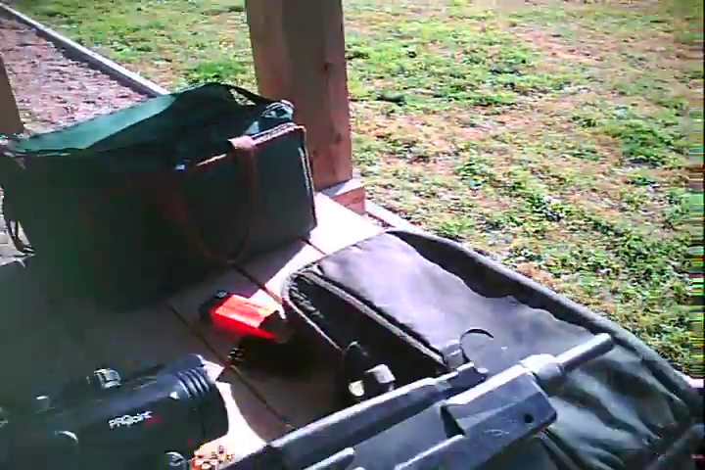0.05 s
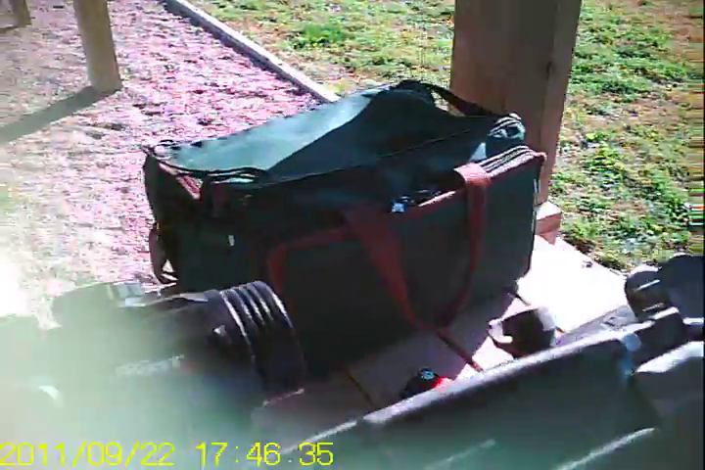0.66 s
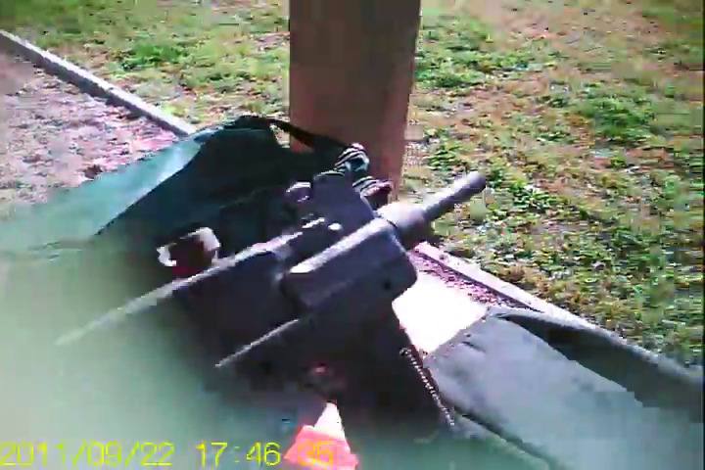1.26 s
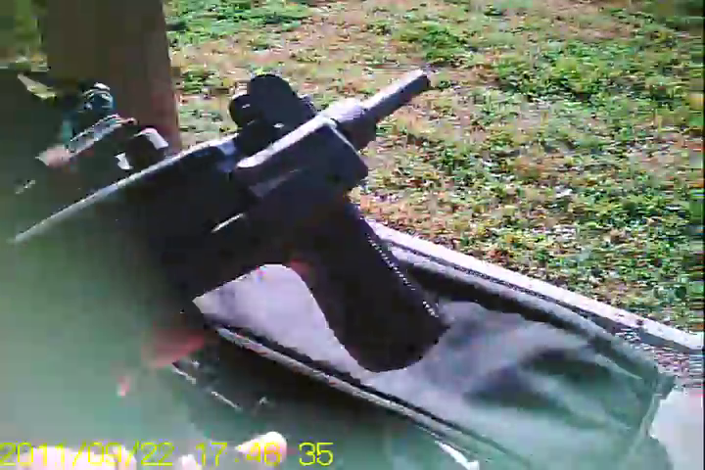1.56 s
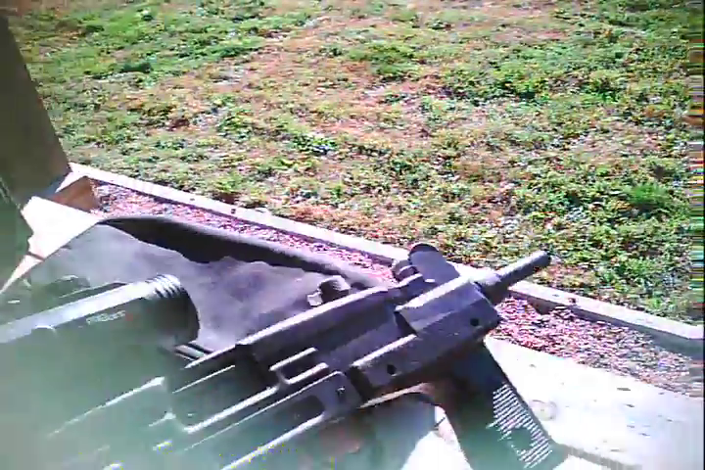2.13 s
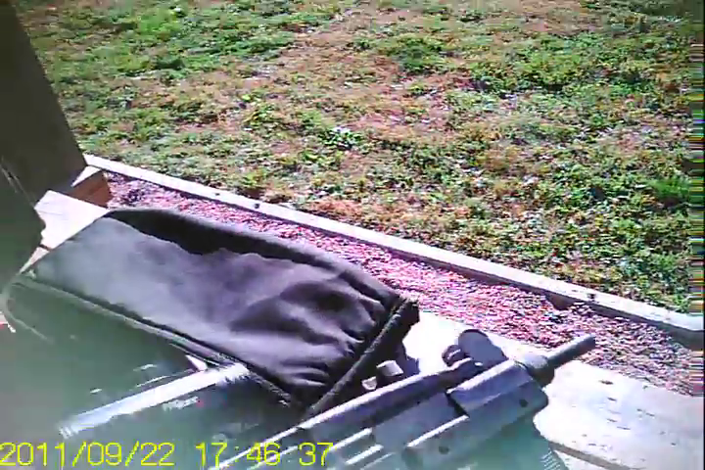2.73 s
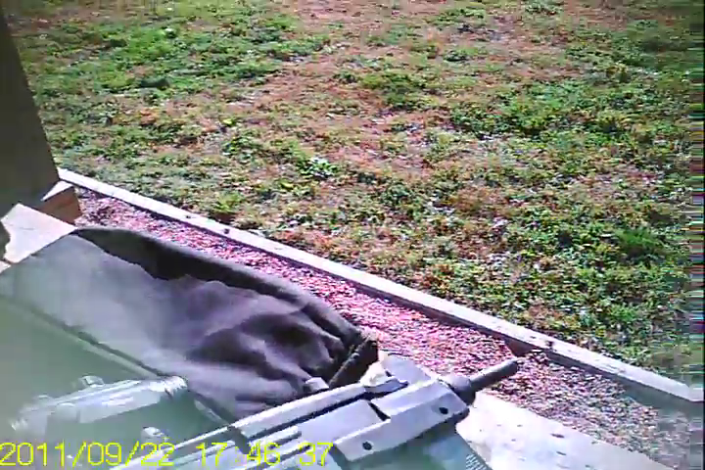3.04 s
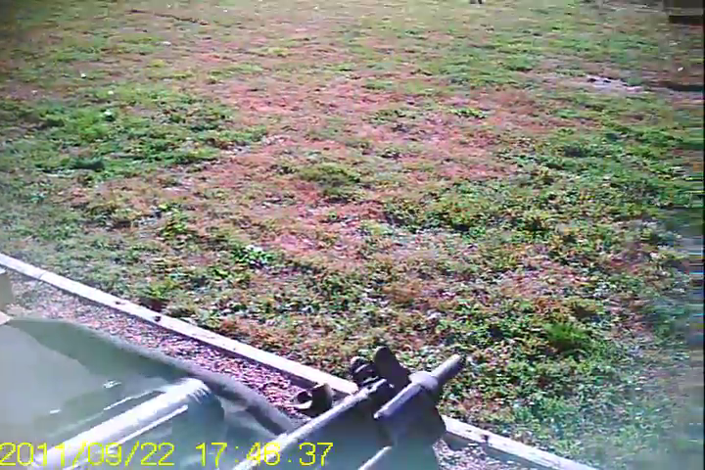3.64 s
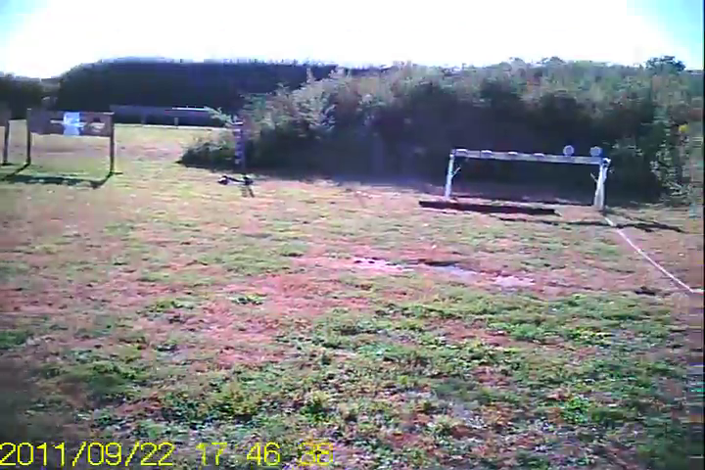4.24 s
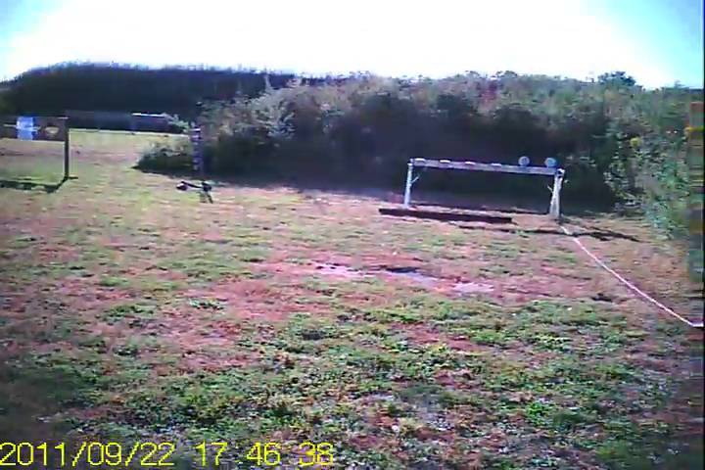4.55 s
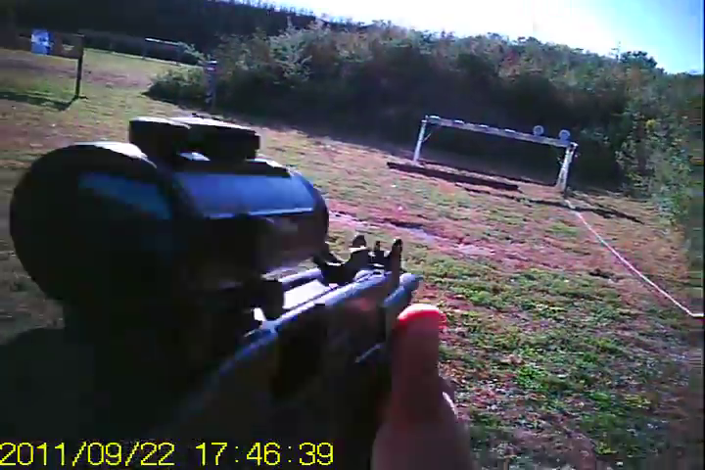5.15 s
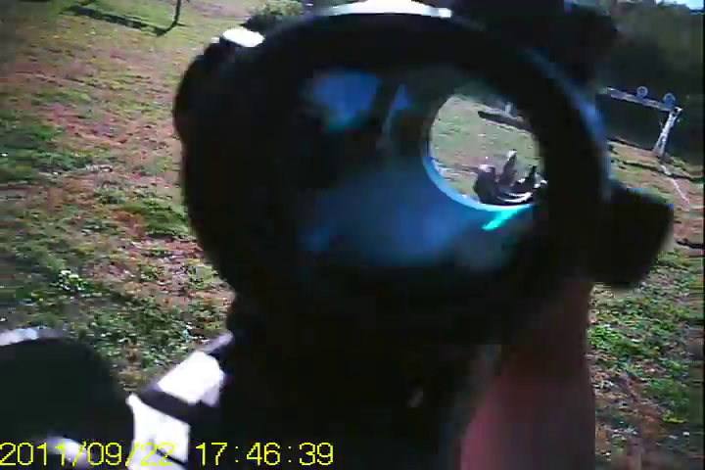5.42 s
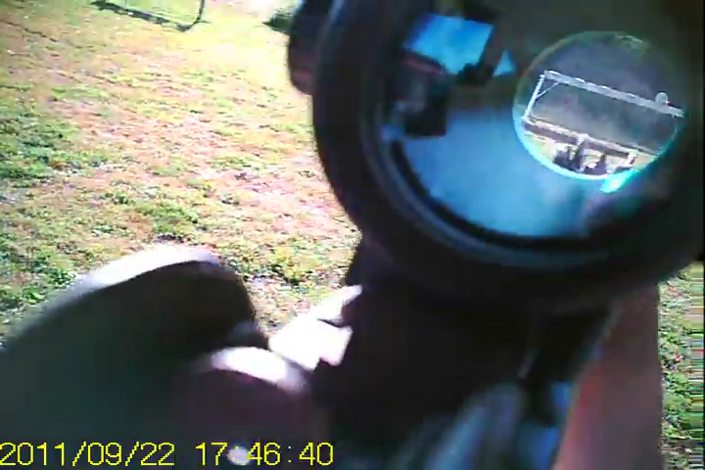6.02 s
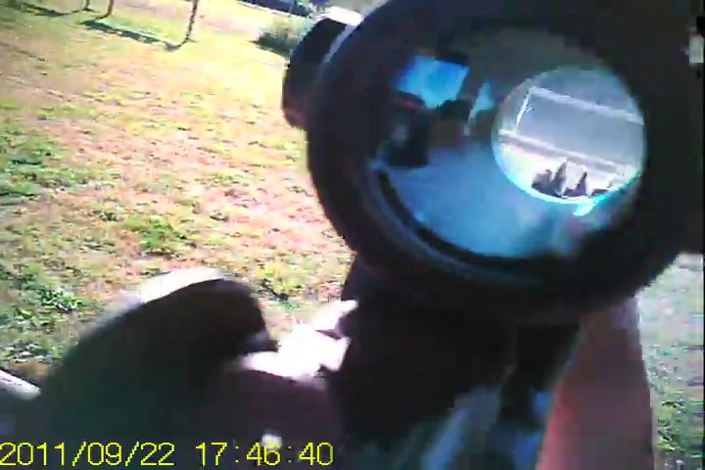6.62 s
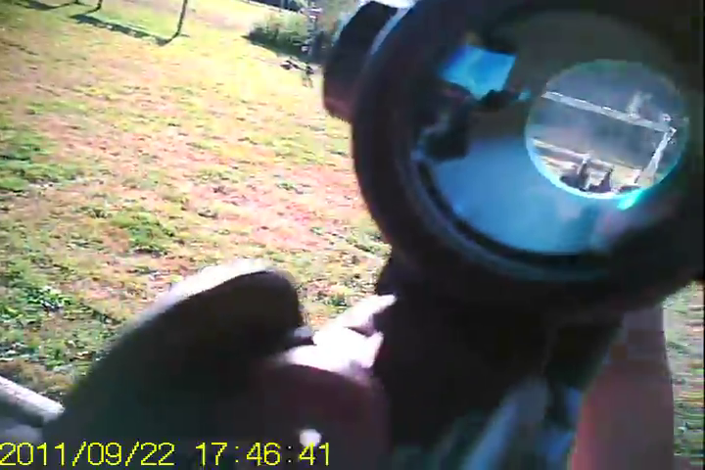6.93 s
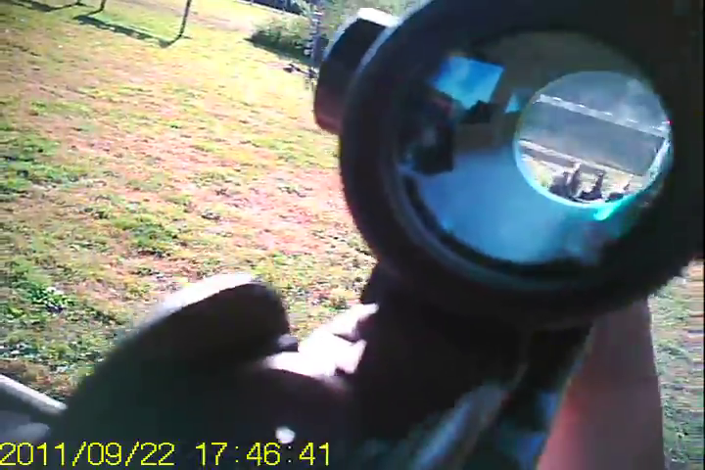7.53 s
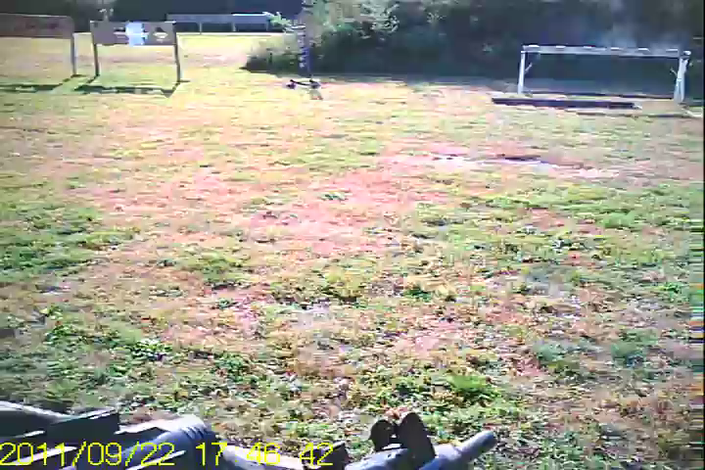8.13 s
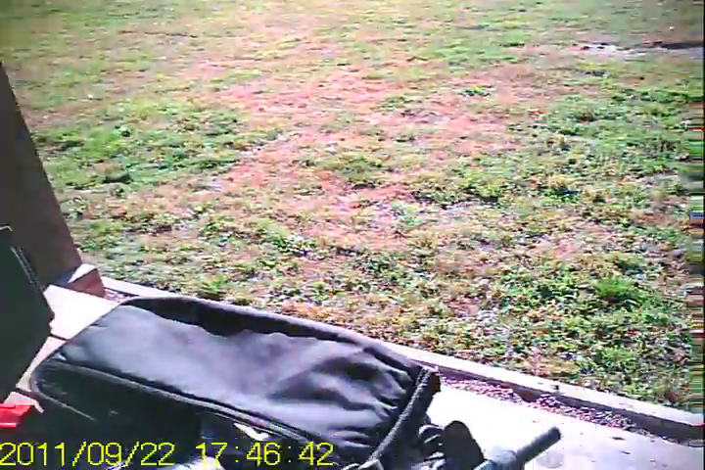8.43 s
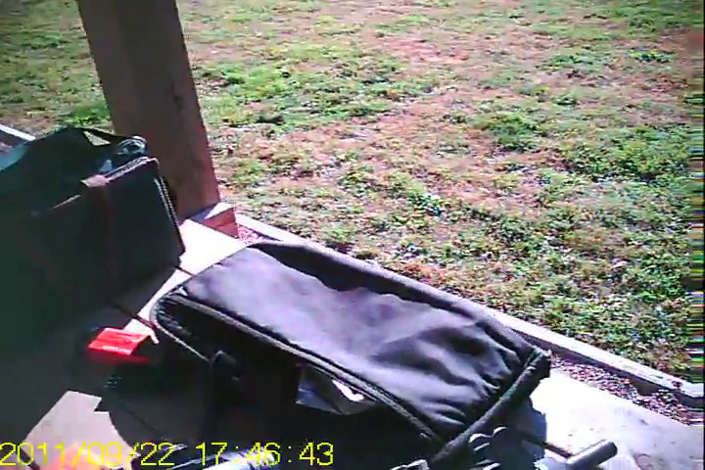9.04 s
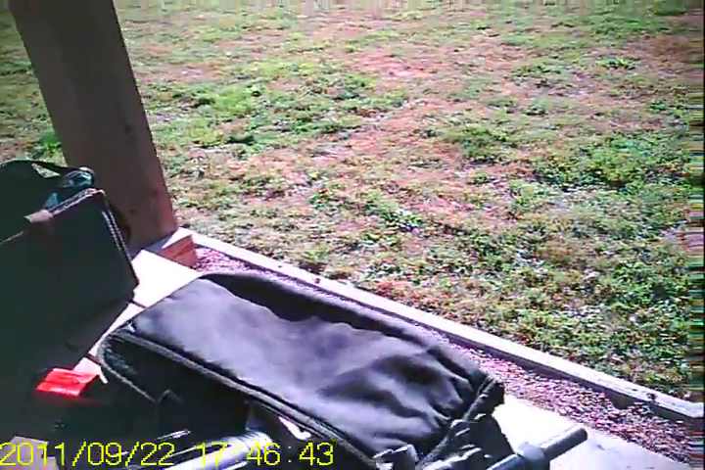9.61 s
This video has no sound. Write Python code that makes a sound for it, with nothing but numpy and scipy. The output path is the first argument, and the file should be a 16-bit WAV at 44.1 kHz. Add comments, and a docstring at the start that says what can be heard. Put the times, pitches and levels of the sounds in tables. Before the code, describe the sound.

Sharp metallic clicks, scrapes and clanks come from a submachine gun being readied right beside a small, cheap microphone buffeted by wind. Two quick automatic bursts follow, two rounds and then three, badly distorted and echoing briefly across an outdoor range. Brass cases tinkle, and the gun knocks down onto a wooden bench. Scattered distant shots sound near the start and end, with faint insects and far birds behind.

```python
"""At a roofed outdoor range, a submachine gun bumps on a wooden bench and is lifted, while shots crack
from farther lanes. Its steel parts click, scrape and clank close to a tiny worn camera. It fires two short
bursts that overflow the camera's converter into harsh crackle; spent cases ring as they land. At last the
gun is laid down again. All along, wind rumbles on the microphone over faint insects, joined by far birds
before the bursts."""
import sys
import numpy as np
from scipy import signal
from scipy.fft import rfft, irfft, next_fast_len
from scipy.io import wavfile
from scipy.ndimage import map_coordinates

SR = 44100
rng = np.random.default_rng(int(sys.argv[2]) if len(sys.argv) > 2 else 0)


def materialize(psi):
    """Save the field psi as 16-bit PCM at rate SR to the path in sys.argv[1].

    A 1-D psi becomes a single channel; in a 2-D psi each row is a channel.
    """
    bounded = np.clip(np.atleast_2d(psi).T, -1, 1)
    quanta = np.round(bounded * 32767).astype(np.int16)
    wavfile.write(sys.argv[1], SR, quanta)


N = 435266
TIME = np.arange(N) / SR
HIT = TIME[:SR]  # the one-second clock of a single hit

# Rounds fired, ten a second within a burst. Each row: start in seconds, level in dB.
ROUNDS = [(6.062, 20), (6.164, 19.5), (6.813, 18.5), (6.912, 19), (7.012, 15.3)]
# Tone colours of the muzzle blast, struck steel and airy hiss. Each row: frequency in Hz, level in dB.
BLAST = [(65, -42), (110, -9.5), (320, -6), (487, -2.5), (700, -13.5), (914, -5.5), (1470, -6), (1890, -3),
         (2560, -18), (3040, -16), (6390, -26), (7740, -27), (10500, -39), (13600, -64.5), (22000, -120)]
STEEL = [(180, -39.5), (300, -16.5), (876, -10.5), (1050, -4.5), (1230, -12.5), (1790, -5.5), (2370, -19),
         (3390, -10.5), (4050, -17), (7800, -17), (8920, -21), (9890, -18.5), (10500, -21.5), (13600, -65),
         (22000, -120)]
HISS = [(210, -29.5), (350, 0.5), (752, -3), (933, -7), (1360, -3.5), (1500, -7.5), (2060, -6.5),
        (2680, -13.5), (3420, -8), (4010, -15.5), (4250, -11.5), (5670, -15.5), (11000, -18), (14300, -47),
        (22000, -120)]


def gunfire(field_db=-35, field_t60=1.345, boom_db=-43, boom_t60=2.6):
    """Each blast rings under the roof, band by band, drums on it and rolls away across the field."""
    # The tail under the roof. Each row: frequency in Hz, t60 in seconds.
    roof_decay = [(100, .45), (400, 0.4), (1500, .37), (4000, 0.32), (10000, 0.26)]
    # The roof drumming. Each row: frequency in Hz, level in dB.
    drumming = [(55, -35.5), (75, -4.5), (87, 0), (100, -11), (150, -17.5), (400, -93.5)]
    field_tilt = [(300, -4), (1800, -0.5), (4700, 1), (8000, -2.5)]
    out = np.zeros(N)
    for start, db in ROUNDS:
        hz, t, bands = signal.stft(noise(BLAST), SR, nperseg=256)
        decay = np.exp(-np.log(1000) * t / along(roof_decay, hz)[:, None])
        roof = signal.istft(bands * decay, SR, nperseg=256)[1][:SR]
        field = amp(field_db) * fade(field_t60) * noise(BLAST, tilt=field_tilt)
        boom = amp(boom_db) * fade(boom_t60) * noise(drumming)
        add(out, start, amp(db) * (roof + field + boom))
    return out


def berm_echo(delay_s=0.19, rise_s=0.021, t60=0.6, gain_db=-33):
    """The earth bank behind the targets throws each blast back, its treble softened by the brush."""
    # The ring in the echo. Each row: centre in Hz, width in Hz, boost in dB.
    peaks = [(4630, 400, 11), (5730, 330, 6.5)]
    tilt = [(300, -6), (1800, -1), (3000, 3), (4700, -3.5), (8000, -3)]
    out = np.zeros(N)
    for start, db in ROUNDS:
        echo = resonate(noise(BLAST, tilt=tilt), peaks)
        add(out, start + delay_s, amp(db + gain_db) * echo * fade(t60) * attack(rise_s))
    return out


def cases(shimmer_db=3.5, spread_hz=51, rise_s=0.0087):
    """A spent brass case rings high and long, shimmering as it tumbles."""
    # Landings and bounces. Each row: start in seconds, pitch in Hz, level in dB, t60 in seconds.
    landings = [(6.351, 7450, -25, 0.24), (6.533, 10300, -48, 0.29), (6.61, 10230, -41, 0.24),
                (6.691, 10200, -45, 0.31), (7.34, 10240, -31.5, 0.4), (7.377, 10180, -36.5, 0.38),
                (7.592, 10250, -41, 0.36), (7.72, 10200, -54, 0.55), (7.885, 10196, -51.5, .6),
                (8.335, 10220, -49, .5)]
    out = np.zeros(N)
    for start, hz, db, t60 in landings:
        pitch = hz + spread_hz * wobble(220)
        ring = amp(shimmer_db * wobble(60)) * np.sin(2 * np.pi * np.cumsum(pitch) / SR)
        add(out, start, amp(db) * ring * fade(t60) * attack(rise_s))
    return out


def clicks(gain_db=-5, echo_db=-23, body_db=9, treble_db=6, ring_db=7, ring_width=0.095, rise_s=0.00026):
    """Hand-damped steel gives a short, dense ring; one resonance stands out where it is struck."""
    # Magazine, bolt and other parts. Each row: start in seconds, level in dB, body in dB,
    # treble in dB, ring in Hz, t60 in seconds.
    contacts = [(1.209, -32, -23, -7, 2410, 0.032), (1.363, -29.5, -15, 8, 5500, 0.032),
                (1.58, -3.5, -10, -16, 1220, .036), (1.612, -7, -5, -13, 1130, 0.042),
                (1.808, -28, -2, -16, 1120, 0.063), (1.985, -17.5, 6, -11, 1590, 0.03),
                (2.009, 0, -7.5, -5, 3070, 0.029), (2.096, -4.5, -14, -4.5, 1610, 0.028),
                (2.159, -4.5, -21, 4, 4200, 0.015), (2.166, -16, -3, -5, 1540, 0.023),
                (2.236, -12, -3, -6.5, 1540, 0.012), (2.286, -13.5, 2, -7, 1370, 0.082),
                (2.433, -13.5, -9, -13.5, 1560, 0.03), (2.748, 5, -28, 12, 1820, 0.019),
                (2.751, -2, -15, -6, 2880, 0.054), (3.047, -10, -15, -2, 1650, 0.014),
                (3.081, -13, -25, -6.5, 1720, 0.066), (3.165, -3.5, -32, -2, 2140, 0.03),
                (3.664, -8.5, -5.5, -1.5, 3380, 0.063), (3.674, -3, -15, 1, 1470, 0.027),
                (3.786, -21, -2, -5, 1050, 0.14), (3.824, -16, -7, -6, 1430, 0.046),
                (3.844, 2, -21, 10, 3530, 0.025), (3.895, -10.5, -15, 0, 1410, 0.03),
                (3.957, 4, -1, -0.5, 1980, 0.044), (4.023, -16.5, -30, -8, 1910, 0.061),
                (4.042, -12.5, -8, 4.5, 1110, 0.092), (4.06, -9.5, -9, -1, 1110, 0.02),
                (4.123, 4.5, -34, 6.5, 3065, 0.05), (4.217, -18, -27, -11, 1020, 0.11),
                (4.233, -14.5, -17, 0, 2000, 0.19), (4.316, 2, -33, 0, 1914, 0.076),
                (4.376, 4.5, -38, -16, 1810, 0.036), (4.44, 6.5, -28, -1, 1455, 0.041),
                (4.755, -32, -14, -16, 1800, .03), (4.925, -29.5, -20, 6, 9700, .04),
                (4.955, -32, -8, -4, 2100, 0.034), (5.001, -24.5, -10, -4, 1770, 0.022),
                (5.101, 4, 8, -6, 2280, 0.029), (5.112, -18, 12, -8, 1720, 0.036),
                (5.208, -23, 10, -27, 1840, 0.12), (5.234, -14.5, 9, -13, 1970, 0.03),
                (5.332, -16.5, 1, -17, 1960, 0.015), (6.014, -2.5, -32, -20.5, 1790, 0.02),
                (6.608, -4, -12, -13.5, 1590, 0.043), (6.682, -4, -1, -21.5, 1680, 0.091),
                (6.773, -6, -26, -26, 1764, 0.063), (7.374, -3.5, -1.5, -16, 1490, 0.033),
                (7.416, -10.5, -10, -15, 1100, 0.062), (7.591, -7, -6, -12, 1320, 0.1),
                (7.717, -1, -21, -19, 1190, 0.0089), (7.885, -21, -5, -17.5, 1710, 0.14),
                (8.017, -29, -2, -15, 1980, 0.24), (8.805, -18, -8, -5, 1600, 0.024),
                (8.851, -30, -1, -9, 1000, 0.034), (8.974, 2.5, -41, -1.5, 2060, 0.018),
                (9.049, -7, 1, -13, 1550, 0.0084), (9.16, -4, -26, 2.5, 3480, 0.0064),
                (9.317, -18, -8, -8, 1800, 0.02)]
    out = np.zeros(N)
    for start, db, body, treble, ring_hz, t60 in contacts:
        tilt = [(500, body + body_db), (1300, 0.052), (2800, 0.017), (6000, treble + treble_db)]
        steel = noise(STEEL, tilt=tilt)
        ring = filtered(steel, lambda hz: 1 + amp(ring_db) * bell(hz, ring_hz, ring_width * ring_hz))
        contact = unit(ring) * fade(t60) * attack(rise_s)
        add(out, start, amp(db + gain_db) * (contact + amp(echo_db) * roof_echo()))
    return out


def scrapes(rough_db=3, release_t60=0.066, echo_db=-13):
    """Steel sliding on steel catches and slips, then rings out."""
    # Each row: start in seconds, length in seconds, level in dB.
    slides = [(2.758, 0.017, 3.5), (4.267, 0.018, -9), (4.285, 0.015, -6.5), (4.464, 0.034, -12.5),
              (4.492, 0.025, -4.5), (6.014, 0.0045, -8.5), (6.037, 0.022, -2), (6.766, 0.0047, -10.5),
              (6.792, 0.025, -6)]
    out = np.zeros(N)
    for start, length, db in slides:
        stroke = np.exp(-np.log(1000) * np.maximum(HIT - length, 0) / release_t60)
        slips = amp(rough_db * wobble(300))
        steel = noise(STEEL, tilt=[(300, -9.5), (1500, 1), (7000, 3)])
        add(out, start, amp(db) * stroke * slips * steel)
        add(out, start + length / 2, amp(db + echo_db) * roof_echo())
    return out


def clanks(reach_octaves=0.29):
    """The hollow sheet-steel receiver rings in close modes; where it is struck decides which lead."""
    # Hard contacts. Each row: start in seconds, level in dB, centre of the favoured modes in Hz.
    blows = [(0.044, -12, 1500), (2.788, -20.5, 1700), (4.318, -12.5, 1950), (4.374, -22.5, 1850),
             (4.441, -21, 1900), (4.508, -34.5, 1900), (9.44, -17, 1480)]
    # The receiver's modes. Each row: pitch in Hz, level in dB, t60 in seconds.
    receiver = [(1190, -6, 0.17), (1418, -5, .15), (1653, -5.5, 0.17), (1756, 2.5, 0.069), (1895, -7, 0.17),
                (2022, -6, 0.21), (2300, -1, 0.054), (2930, -5.5, 0.08)]
    out = np.zeros(N)
    for start, db, centre_hz in blows:
        modes = []
        for hz, level, t60 in receiver:
            distance = np.log2(hz / centre_hz) / reach_octaves
            modes.append((hz, level - 10 * np.log10(1 + distance ** 2), t60))
        add(out, start, amp(db) * ringing(modes))
    return out


def clinks():
    """A small loose steel fitting swings against the gun and rings briefly."""
    # Each row: start in seconds, level in dB.
    swings = [(7.718, -29), (9.158, -13)]
    # The fitting's modes. Each row: pitch in Hz, level in dB, t60 in seconds.
    fitting = [(1480, -20, 0.068), (3670, 5, 0.019), (3820, 1, 0.02), (5340, -7, 0.021), (8450, -12, .025)]
    out = np.zeros(N)
    for start, db in swings:
        add(out, start, amp(db) * ringing(fitting))
    return out


def bumps(thud_db=-3, boards_db=-13, clack_db=2, clack_delay_s=0.002, rise_s=0.00088, echo_db=-18):
    """The gun bumps the bench: the wood thuds, its boards ring and the steel clacks just after."""
    # Each row: start in seconds, level in dB, relative clack level in dB.
    knocks = [(0.009, -11, -9.5), (0.039, -4, -1.5), (0.123, -15.5, -6.5), (0.174, -26.5, -10.5),
              (0.323, -37.5, -44), (0.583, -21, -8.5), (0.653, -29.5, -21), (0.679, -29, -25),
              (0.711, -37, -21), (0.773, -37.5, -24), (9.433, -2.5, -8), (9.53, -22.5, -12.5),
              (9.581, -20, -47), (9.603, -1.5, -8.5), (9.613, -10.5, -32)]
    # The colour of the thud. Each row: frequency in Hz, level in dB.
    bench = [(80, -8), (170, 9.5), (270, 6.5), (360, 6), (480, 8.5), (620, 6.5), (900, 4), (1300, -6),
             (1900, -13.5), (2700, -51), (6000, -22.5)]
    # The boards' modes. Each row: pitch in Hz, level in dB, t60 in seconds.
    boards = [(168.4, -7.5, 0.29), (305.2, 3.5, 0.17), (352, -21, 0.26), (508.3, 3.5, 0.11),
              (765, -15, 0.29), (940, -20.5, 0.046)]
    out = np.zeros(N)
    for start, db, clack in knocks:
        thud = amp(thud_db) * noise(bench) * fade(t60=0.14)
        wood = (thud + amp(boards_db) * ringing(boards)) * attack(rise_s)
        steel = amp(clack + clack_db) * noise(STEEL, tilt=[(500, -2.5), (5000, 16)]) * fade(t60=0.037)
        add(out, start, amp(db) * (wood + amp(echo_db) * roof_echo()))
        add(out, start + clack_delay_s, amp(db) * steel)
    return out


def roof_echo(t60=0.26, rise_s=0.003):
    """The dull, diffuse answer of roof and bench to a small sound."""
    return noise(STEEL, tilt=[(2000, -4), (4000, -6.5), (10000, -9.5)]) * fade(t60) * attack(rise_s)


def handling(ticks_per_s=40, tick_db=10, tick_t60=0.014, attack_s=0.39, release_s=0.78):
    """Clothes rustle and loose gun parts tick as each movement builds up, holds and dies away."""
    # Lifting, loading, shouldering, laying down. Each row: start and length in seconds, level in dB.
    moves = [(1.4, 2.5, -53.5), (3.833, 0.09, -58.5), (4.955, 0.32, -58.5), (8.686, 1.24, -48.5)]
    folds = amp(2.5 * wobble(25, size=N))
    cloth = folds * noise(HISS, size=N, tilt=[(400, -1.7), (1800, -0.23), (8000, 1)])
    touches = (rng.random(N) < ticks_per_s / SR) * rng.random(N) ** 2
    ticks = signal.fftconvolve(touches, fade(tick_t60))[:N] * noise(STEEL, size=N)
    motion = np.zeros(N)
    for start, length, db in moves:
        before, after = np.maximum(start - TIME, 0), np.maximum(TIME - start - length, 0)
        motion += amp(db) * np.exp(-before / attack_s - after / release_s)
    return motion * (cloth + amp(tick_db) * ticks)


def far_shots(gain_db=-4, treble_db=7, rise_s=0.0013, roll_db=-16):
    """Distance smears each report into a short bright wash that leaves a hollow ring and a dull roll."""
    # Other lanes. Each row: start in seconds, level in dB, treble in dB, base t60 in seconds, ring in dB.
    shots = [(0.4162, -27.5, -9.5, 0.52, -7), (0.9, -30, -1, 0.42, 1), (1.1493, -35.5, -13, 0.55, -6),
             (1.2354, -38.5, -15, .8, -9), (6.533, -10, -23, 0.83, -12), (6.7151, -18.5, -22, 0.58, -10),
             (8.53, -17.5, -19.5, 0.4, -10), (9.2282, -22.5, -19, 0.63, -7), (9.7099, -19, 6, 0.2, -12)]
    # The thin colour of a report. Each row: frequency in Hz, level in dB.
    report = [(400, -13), (750, -10.5), (1200, -6), (1700, -2), (2050, -13), (2500, -4.5), (3500, -7),
              (4200, -7), (5400, -10), (6300, -6), (8000, -5.5), (10500, -11)]
    # Its hollow ring. Each row: centre in Hz, width in Hz, boost in dB.
    peaks = [(2020, 220, 19), (3630, 260, 20), (5510, 280, 20), (7420, 300, 13), (9330, 300, 15)]
    out = np.zeros(N)
    for start, db, treble, t60, ring_db in shots:
        tilt = [(2500, 0.0037), (7000, treble + treble_db)]
        crack = noise(report, tilt=tilt) * fade(0.5 * t60)
        hollow = unit(resonate(noise(report, tilt=tilt), peaks))
        ring = amp(ring_db) * hollow * fade(1.15 * t60)
        roll = amp(roll_db) * noise(report, tilt=[(2000, 35), (7000, -15)]) * fade(1.5 * t60)
        add(out, start, amp(db + gain_db) * (crack + ring + roll) * attack(rise_s))
    return out


def wind(surge_db=3, surge_rate=9, lumps_db=3.5, flutter_db=-44.5, flutter_growth=0.58):
    """The draught surges on the microphone and flutters as it grows; puffs swell and sink on top."""
    # Air passing the camera, strongest with the gun raised. Each row: time in seconds, level in dB.
    draught = [(0, -41), (0.45, -36), (1.4, -34), (1.88, -40), (2.05, -32), (3.25, -18), (4.3, -25),
               (4.72, -36), (4.95, -23.5), (5.9, -29.5), (7.8, -28), (8.5, -32), (9.4, -28.5), (9.87, -36)]
    # Each row: centre in seconds, length in seconds, flutter in dB, deep push in dB.
    puffs = [(1.414, 0.21, -47, -25), (1.614, 0.28, -38.5, -31), (2.067, 0.25, -27.5, -30.5),
             (2.252, 0.23, -23, -21.5), (2.51, 0.34, -27, -38), (2.721, 0.16, -21, -18),
             (3.086, 0.16, -26, -25), (3.191, 0.18, -18.5, -19), (3.703, 0.13, -28.5, -13.5),
             (5.135, 0.13, -39, -16), (5.517, 0.25, -27.5, -21), (8.048, 0.14, -31, -23.5),
             (8.182, 0.099, -31, -39)]
    # Colours of the deep buffeting and the flutter above it. Each row: frequency in Hz, level in dB.
    buffet_colour = [(5, -6.5), (20, 5), (50, -7), (75, -11.5), (120, -31.5), (300, -80.5)]
    flutter_colour = [(40, -12), (85, -1), (140, -11), (250, -18), (500, -44.5), (1500, -82.5)]
    draught_db = automation(draught) + surge_db * wobble(surge_rate, size=N)
    buffet = amp(draught_db)
    flutter = amp(flutter_db + flutter_growth * (draught_db - draught_db.mean()))
    for centre, length, puff_db, push_db in puffs:
        swell = np.cos(np.pi * np.clip((TIME - centre) / length, -0.5, 0.5))
        buffet = np.hypot(buffet, amp(push_db) * swell)
        flutter = np.hypot(flutter, amp(puff_db) * swell)
    lumps = unit(amp(lumps_db * wobble(18, size=N)))
    return buffet * noise(buffet_colour, size=N) + flutter * lumps * noise(flutter_colour, size=N)


def hiss(level_db=-58):
    """A faint, steady bed of hiss."""
    return amp(level_db) * noise(HISS, size=N)


def insects(flicker_db=3):
    """Insects in the grass buzz in a high band that swells and fades."""
    # Each row: time in seconds, level in dB.
    swells = [(0, -75), (1.4, -63.5), (3.3, -54), (5.8, -60.5), (8.2, -63), (9.87, -53.5)]
    # The colour of the buzz. Each row: frequency in Hz, level in dB.
    buzz = [(4000, -47.5), (6600, -10.5), (7500, -0.5), (8100, -4), (9300, -10), (11000, -61.5)]
    return amp(automation(swells) + flicker_db * wobble(42, size=N)) * noise(buzz, size=N)


def birds(count=70, pitch_hz=4500, level_db=-64, blur=0.6, start_s=1.7, end_s=5.95, chirp_s=0.035, fall=0.1):
    """Far birds call in faint, quick, falling chirps, blurred by the trees."""
    out = np.zeros(N)
    progress = np.minimum(HIT / chirp_s, 1)
    for when, pitch, strength in rng.random((count, 3)):
        hz = pitch_hz * (0.92 + 0.16 * pitch) * (1 + fall * (0.5 - progress))
        chirp = np.sin(np.pi * progress) ** 2 * np.sin(2 * np.pi * np.cumsum(hz) / SR)
        add(out, start_s + when * (end_s - start_s), amp(level_db) * (0.5 + strength) * chirp)
    return out * (1 + blur * wobble(250, size=N))


def amp(db):
    """Decibels to gain."""
    return 10 ** (np.asarray(db) / 20)


def unit(x):
    """Scale to rms 1."""
    return x / np.sqrt(np.mean(x ** 2) + 1e-20)


def along(points, hz):
    """Read a curve of (Hz, value) points on a log frequency axis."""
    knots_hz, values = np.transpose(points)
    return np.interp(np.log(hz + 1), np.log(knots_hz + 1), values)


def automation(points):
    """A fader ride through (seconds, value) points."""
    return np.interp(TIME, *np.transpose(points))


def wobble(rate, size=SR):
    """A smooth random curve, rate knots a second."""
    knots = rng.standard_normal(int(size * rate / SR) + 4)
    return map_coordinates(knots, [np.arange(size) * rate / SR])


def filtered(x, gain):
    """Equalise x with a gain that depends on frequency."""
    padded = next_fast_len(len(x) + 4096)
    return irfft(rfft(x, padded) * gain(np.fft.rfftfreq(padded, 1 / SR)), padded)[:len(x)]


def bell(hz, centre, width):
    """A resonance curve of height 1."""
    return 1 / (1 + (2 * (hz - centre) / width) ** 2)


def resonate(x, peaks):
    """Boost x at (Hz, width in Hz, dB) peaks."""
    return filtered(x, lambda hz: amp(sum(db * bell(hz, centre, width) for centre, width, db in peaks)))


def low_pass(x, edge_hz):
    """A steep, smooth band limit."""
    return filtered(x, lambda hz: 1 / (1 + (hz / edge_hz) ** 90))


def noise(spectrum, size=SR, tilt=((1, 0), (SR, 0))):
    """Noise of rms 1 with a spectrum and an added tilt, both (Hz, dB)."""
    white = rng.standard_normal(size)
    return unit(filtered(white, lambda hz: amp(along(spectrum, hz) + along(tilt, hz))))


def ringing(modes):
    """Strike (Hz, dB, t60) modes, each at a slightly random strength and a random phase."""
    return sum(amp(db + rng.normal(0, 2.6)) * fade(t60) * np.sin(2 * np.pi * (hz * HIT + rng.random()))
               for hz, db, t60 in modes)


def attack(rise_s):
    """An onset with time constant rise_s."""
    return 1 - np.exp(-HIT / rise_s)


def fade(t60):
    """A decay that loses 60 dB in t60 seconds."""
    return np.exp(-np.log(1000) * HIT / np.maximum(t60, 1e-3))


def add(track, start, sound):
    """Mix a sound in at start seconds."""
    part = track[max(round(start * SR), 0):][:len(sound)]
    part += sound[:len(part)]


def scene():
    """Everything that reaches the one microphone, through the camera's housing."""
    # The camera body's resonances. Each row: centre in Hz, width in Hz, boost in dB.
    housing = [(1941, 300, 2), (3370, 300, 2), (4888, 380, 2.5), (5726, 370, 1.5), (9870, 110, 2)]
    gun = gunfire() + berm_echo() + clicks() + scrapes() + clanks() + clinks() + bumps() + cases()
    air = gun + handling() + far_shots() + wind() + hiss() + insects() + birds()
    return resonate(air, housing)[None]


def record(dry, overflow=0.97, full_scale=0.7, ceiling=0.75, top_hz=16100):
    """A half-rate converter clips, then overflows: loud samples flip sign, saturated ones land on zero."""
    # The converter's output filter. Each row: frequency in Hz, gain in dB.
    smoothing = [(9800, -1.5), (10500, -2.5), (11100, -5), (11850, -19), (12500, -46), (13500, -73)]
    samples = low_pass(dry[0], edge_hz=SR / 4)[::2]
    saturated = np.clip(samples, -2 * overflow, 2 * overflow)
    wrapped = (saturated + overflow) % (2 * overflow) - overflow
    spaced = np.zeros(N)
    spaced[::2] = 2 * np.clip(wrapped, -full_scale, full_scale)  # doubled to offset the zeros between
    smooth = filtered(spaced, lambda hz: amp(along(smoothing, hz)))
    # the output filter overshoots on the spikes, and these tips are cut off
    return low_pass(np.clip(smooth, -ceiling, ceiling), edge_hz=top_hz)[None]


dry = scene()
out = record(dry)
materialize(out)
```